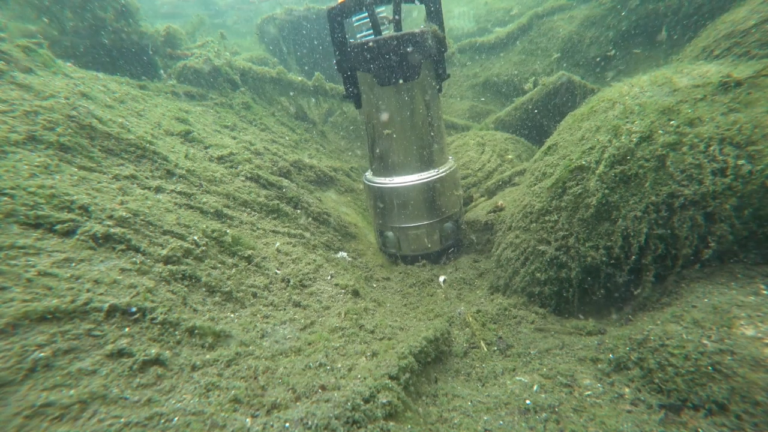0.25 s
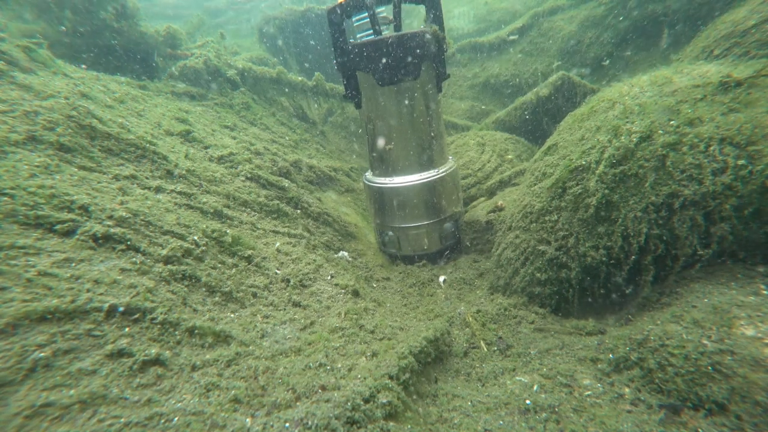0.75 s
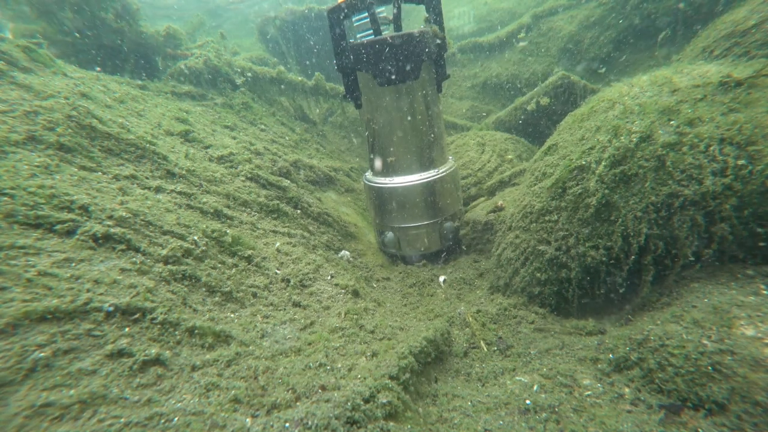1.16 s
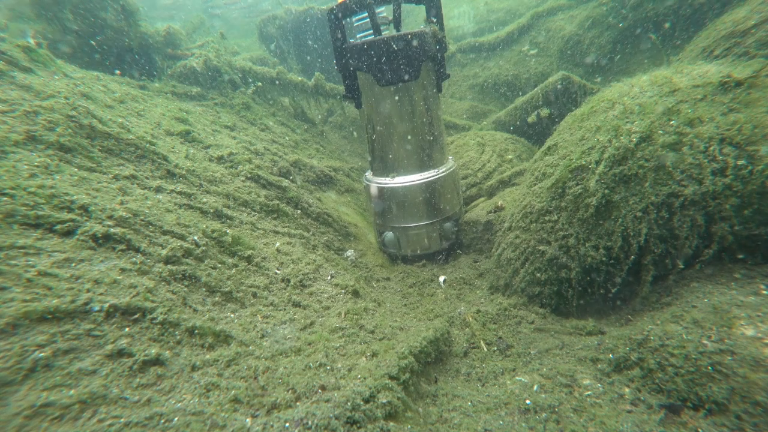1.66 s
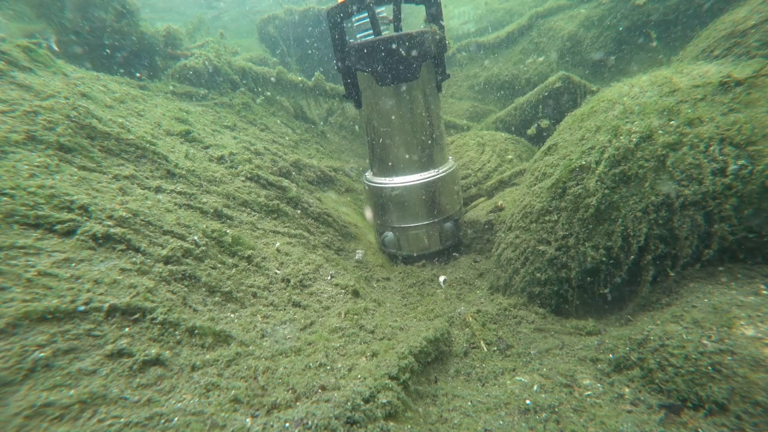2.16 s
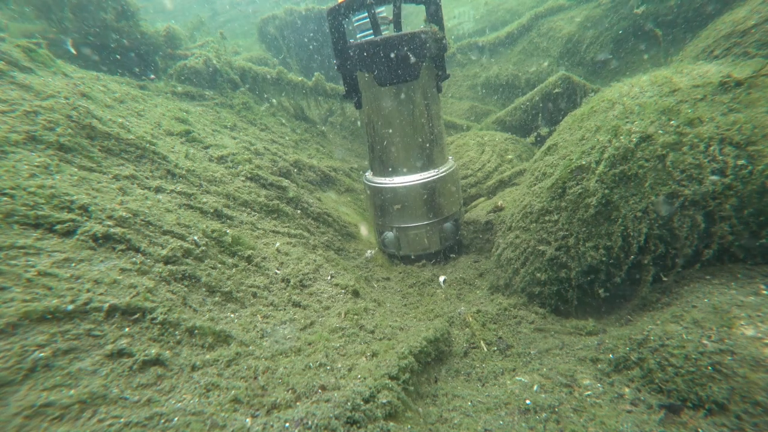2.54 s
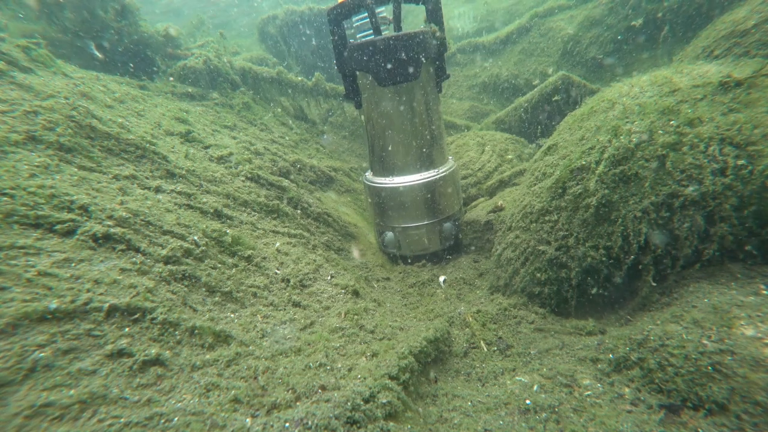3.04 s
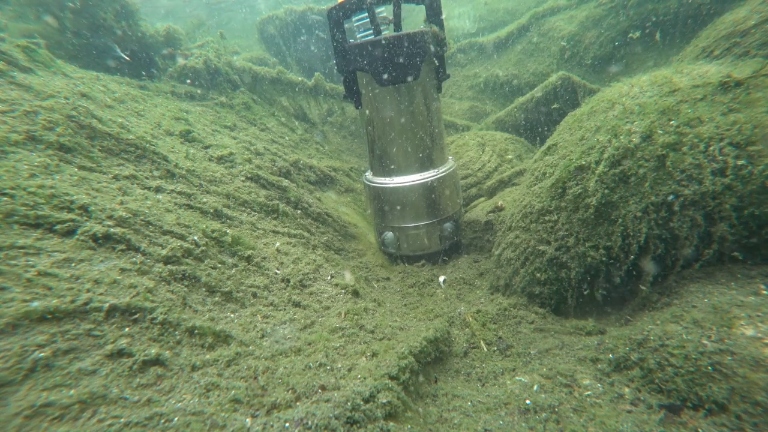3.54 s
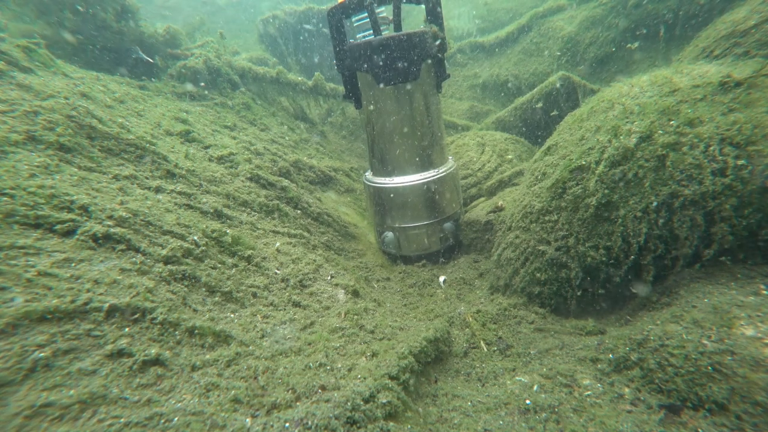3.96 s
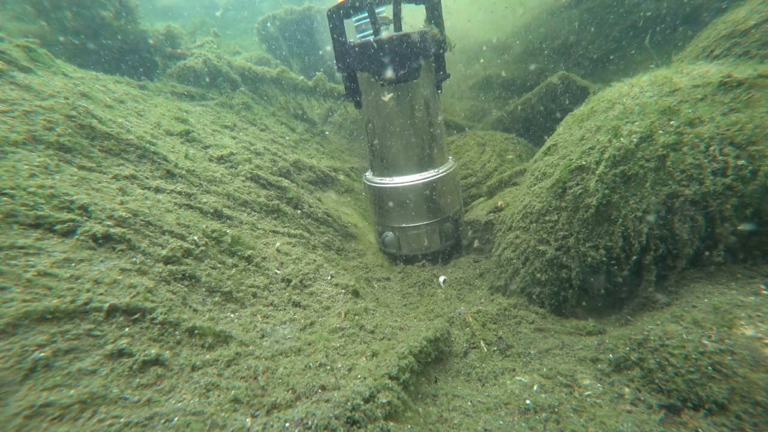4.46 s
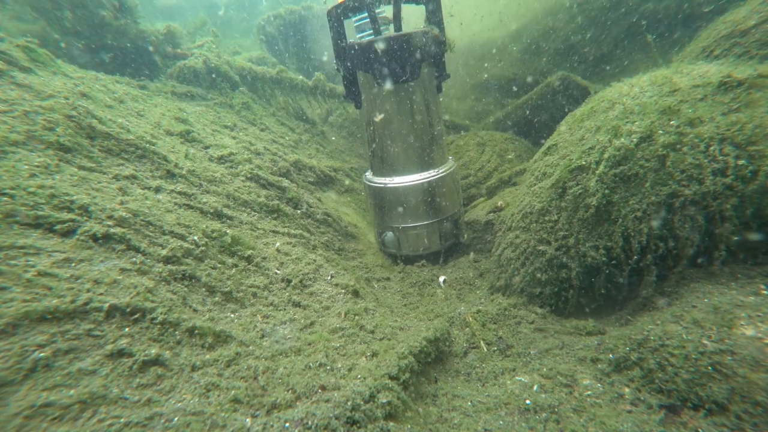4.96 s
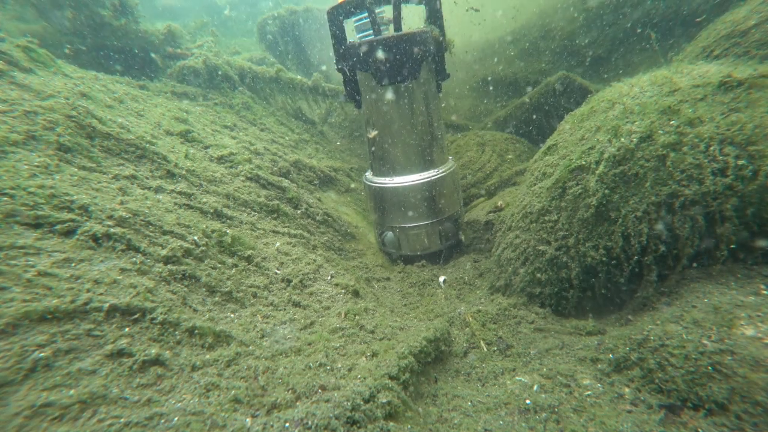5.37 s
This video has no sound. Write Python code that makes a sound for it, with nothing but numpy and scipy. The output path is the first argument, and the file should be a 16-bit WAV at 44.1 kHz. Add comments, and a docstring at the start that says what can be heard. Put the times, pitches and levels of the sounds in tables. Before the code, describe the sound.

Underwater, a running pump gives a low electric hum and an even, fizzing rush of water dotted with bubble blips and ticks.

```python
"""Submersible pump in a pond

A pump runs on the pond bed, heard through two microphones in a sealed case close by.
Its motor hums at twice the mains rate under a churning rush, with bubbles and sharp ticks.
Turbulent water, bubbles and tiny collapsing cavities shake the case, whose resonances
reach each microphone with a different strength and phase."""
import sys
import numpy as np
from scipy import signal
from scipy.fft import rfft, irfft, next_fast_len
from scipy.io import wavfile
from scipy.ndimage import uniform_filter1d

SR = 44100
rng = np.random.default_rng(int(sys.argv[2]) if len(sys.argv) > 2 else 0)


def persist_wave(psi):
    """Save psi, clipped to +-1, as 16-bit WAV."""
    counts = np.round(np.clip(psi, -1, 1) * 32767).astype(np.int16)
    wavfile.write(sys.argv[1], SR, np.atleast_2d(counts).T)


N = 247401
TIME = np.arange(N) / SR


def gain_of(db):
    return 10 ** (np.asarray(db) / 20)


def unit_rms(x):
    return x / np.sqrt(np.mean(x ** 2) + 1e-20)


def add(mix, start_s, sound):
    part = mix[..., round(start_s * SR):][..., :sound.shape[-1]]
    part += sound[..., :part.shape[-1]]


def wander(hz):
    """Random drift of rms 1, changing about hz times a second."""
    coarse = uniform_filter1d(rng.standard_normal(N // 64 + 2), 1 + int(SR / 64 / hz))
    return np.interp(np.arange(N) / 64, np.arange(len(coarse)), unit_rms(coarse))


def minimum_phase(gain):
    """The spectrum with this gain and the sharpest possible attack."""
    cepstrum = irfft(np.log(gain + 1e-6))
    half = len(cepstrum) // 2
    return np.exp(rfft(np.r_[cepstrum[0], 2 * cepstrum[1:half], cepstrum[half], np.zeros(half - 1)]))


def eddies(level_db, top_hz):
    """Water slides past each microphone port on its own: a faint, wide, low wash."""
    wash = signal.sosfilt(signal.butter(2, top_hz, fs=SR, output="sos"), rng.standard_normal((2, N)))
    return gain_of(level_db) * unit_rms(wash)


# Partials of the hum: harmonic, left_db, right_db
HUM_PARTIALS = [(1, -33.6, -33.2), (2, -59, -58), (3, -61, -57), (6, -68, -69), (8, -57, -53)]
def motor_hum(pitch_hz):
    """Magnetic pull of the windings: steady sines that waver a little in level."""
    phase, out = 2 * np.pi * pitch_hz * TIME, 0
    for harmonic, left_db, right_db in HUM_PARTIALS:
        tone = np.sqrt(2) * np.sin(harmonic * phase + 2 * np.pi * rng.random())
        out += gain_of([[left_db], [right_db]]) * tone * gain_of(0.69 * wander(hz=1.2))
    return out


def bubble_swarm(per_s, low_hz, high_hz, decay_cycles, weakest_db):
    """Small bubbles of random size, each ringing as a short dying sine."""
    out, t = np.zeros(N), np.arange(3000) / SR
    for when, pitch, strength in rng.random((2000, 3))[:int(per_s * N / SR)]:
        hz = low_hz * (high_hz / low_hz) ** pitch
        envelope = (1 - np.exp(-t / 0.0033)) * np.exp(-t * hz / decay_cycles)
        level = gain_of(weakest_db + 10.4 * strength)
        add(out, when * N / SR, level * envelope * np.sin(2 * np.pi * hz * t))
    return out


# Bubbles that stand out: peak_s, level_db, pitch_hz, rise_ms, fall_ms
SOLO_BUBBLES = [(0.04, -30.5, 747, 8.6, 5.2), (0.204, -30, 791, 4, 4.9), (0.553, -23.5, 716, 7, 5.6),
                (0.762, -39, 780, 2, 5.3), (0.915, -36, 792, 6, 9.6), (0.945, -36, 797, 11, 5.7),
                (0.97, -27.5, 789, 8.4, 13), (0.981, -30, 1344, 14, 8.7), (1.044, -30, 766, 6.6, 8.3),
                (1.187, -33, 740, 15, 6), (1.422, -25, 729.6, 6.2, 12), (1.547, -29, 806, 6, 15),
                (1.585, -34, 770, 4.5, 3.3), (1.615, -28.5, 574, 12, 14), (1.63, -42, 738, 9.3, 7.3),
                (1.787, -33.5, 830, 2.5, 8), (2.003, -28, 790, 2, 3.7), (2.852, -31, 820, 18, 8),
                (2.995, -30, 789, 9.6, 3.1), (3.268, -31, 920, 7.4, 5), (3.305, -27, 780, 1.3, 6.6),
                (3.314, -29, 676, 6.7, 8), (3.327, -34, 787, 12, 7.8), (3.349, -34, 800, 6, 7.8),
                (4.255, -25, 817, 6, 9.7), (4.27, -28, 750, 11, 6), (4.281, -31, 837, 4.4, 8),
                (4.385, -46, 400, 8, 8), (4.58, -32, 800, 9.7, 15), (4.635, -34, 818, 9, 16),
                (4.698, -28.5, 826, 10, 13), (4.798, -35, 830, 3.1, 7.3), (4.851, -30, 800, 9.5, 5.7),
                (4.912, -30, 858, 18, 19), (5.015, -30, 812, 4, 15), (5.059, -32, 811, 22, 21),
                (5.131, -27, 856, 4.2, 6.7), (5.203, -22.5, 818, 6.2, 6.5), (5.289, -25, 810, 6.6, 5),
                (5.336, -29, 820, 11, 4.2), (5.479, -28, 840, 3.5, 6.6)]
def solo_bubbles(roughness):
    """Each swells and dies as a fluttering tone, panned and phased by the nearest resonance."""
    out, modes = np.zeros((2, N)), np.array(RESONANCES)
    flutter = 1 - roughness + roughness * wander(hz=170)
    for peak_s, level_db, hz, rise_ms, fall_ms in SOLO_BUBBLES:
        t = np.arange(-min(peak_s, .04), .06, 1 / SR)
        _, _, left_db, right_db, lead = modes[abs(modes[:, 0] - hz).argmin()]
        phase, pan_db = 2 * np.pi * hz * t, left_db - right_db
        tone = gain_of([[pan_db / 2], [-pan_db / 2]]) * np.sin([phase, phase + lead])
        envelope = np.exp(-(1000 * t / np.where(t < 0, rise_ms, fall_ms)) ** 2)
        add(out, peak_s + t[0], gain_of(level_db) * envelope * tone)
    return out * flutter


# Accented cavity collapses, levels before filtering: start_s, dull_db, bright_db
COLLAPSES = [(0.0097, 22, 18), (0.1955, 24, 15), (0.1985, 19, 18), (0.452, 17.5, 22.5), (0.9238, 18, 22),
             (0.9778, 21.5, 26), (1.0752, 24.5, 24.5), (1.0758, 18, 17), (1.4624, 19.5, 20),
             (1.4759, 19, 18), (1.4863, 24, 24), (1.8988, 21, 16.5), (1.9057, 14, 23.5), (1.9882, 19, 22),
             (2.0447, 21.5, 11), (2.3229, 21, 10), (2.3455, 20.5, 20), (2.4333, 23.5, 25),
             (2.434, 23.5, 25.5), (2.7544, 19, 25), (3.1232, 21, 10), (3.1976, 25, 15), (3.2457, 25.5, 10),
             (3.2495, 20, 21.5), (3.2637, 24, 10), (3.2673, 17.5, 25), (3.2703, 26.5, 24.5),
             (3.2708, 20, 20), (3.4291, 23.5, 24), (3.6115, 26, 17), (3.6239, 21, 12), (3.7386, 21, 10),
             (3.7533, 20, 17), (3.7715, 22.5, 18), (3.7751, 26.5, 25), (3.7997, 24, 22), (3.8953, 22, 12.5),
             (4.0286, 22.5, 17.5), (4.0364, 20.5, 20), (4.1636, 20, 12), (4.8062, 20.5, 10),
             (4.8543, 20.5, 10), (4.9479, 20, 18.5), (5.0635, 20.5, 13), (5.1116, 19, 17),
             (5.1254, 22.5, 19), (5.4376, 21.5, 15), (5.5925, 21, 12.5)]
def cavity_ticks(ring, f, per_s, base_db, spread_db):
    """Each collapse is a pressure spike striking the case: the accents plus weaker random ones."""
    chance, strength = rng.random(N), np.minimum(rng.exponential(1, N), 3)
    tilt = 2 * rng.random(N) - 1
    spikes = (chance < per_s / SR) * gain_of(base_db + spread_db * (strength + np.array([tilt, -tilt])))
    for start_s, *levels_db in COLLAPSES:
        spikes[:, round(start_s * SR)] += gain_of(levels_db)
    dull, bright = rfft(spikes, 2 * len(f) - 2)
    bright *= gain_of(2.5 * np.log2((f + 1) / 11000))  # rises 2.5 dB per octave
    crossover = 1 / (1 + (7800 / (f + 1)) ** 8)
    return -irfft(ring * ((1 - crossover) * dull + crossover * bright))[:, :N]


def crackle(per_s, spread_db, decay_ms, sputter_db):
    """Power envelope of tiny cavity swarms: random bursts, and a sputter after each accent."""
    chance, strength = rng.random(N), np.minimum(rng.exponential(1, N), 4)
    power = (chance < per_s / SR) * gain_of(2 * spread_db * strength)
    for start_s, *levels_db in COLLAPSES:
        power[round(start_s * SR)] += gain_of(2 * (max(levels_db) + sputter_db))
    tail = np.exp(-np.arange(600) / SR * 1000 / decay_ms)
    return signal.oaconvolve(power, tail)[:N].clip(0)


def struck_case(power, cross, decay_ms):
    """Stereo spectrum of the high resonances struck at once, cut short with their energy kept."""
    left = minimum_phase(np.sqrt(power[0]))
    right = left * np.sqrt(power[1] / power[0]) * cross / abs(cross)
    ring = irfft(np.array([left, right]))
    size = ring.shape[1]
    lag_ms = 1000 * size / SR * abs(np.fft.fftfreq(size))
    snap = ring * np.exp(-lag_ms / decay_ms)
    return rfft(snap * np.linalg.norm(ring) / np.linalg.norm(snap))


# Path of the strongest high resonance, used as a shift about its mean: time_s, centre_hz
TREBLE_SLIDE = [(0.0, 4890), (1.0, 4860), (2.9, 4850), (3.3, 4815), (4.5, 4900), (5.6, 4900)]
def case_shift(spectrum, f, split_hz, waver_hz):
    """The case shifts in the current, so the sound above the split slides a little in pitch."""
    size = 2 * len(f) - 2
    centre_hz = np.interp(TIME, *np.transpose(TREBLE_SLIDE)) + waver_hz * wander(hz=8)
    shift = np.exp(2j * np.pi * np.cumsum(centre_hz - centre_hz.mean()) / SR)
    lower = irfft(spectrum * (f <= split_hz))[:, :N]
    upper = 2 * np.fft.ifft(spectrum * (f > split_hz), size)[:, :N]
    return lower + (upper * shift).real


# Level ride of the treble, with a presence lift near 3 kHz: time_s, level_db, presence_db
FIZZ_RIDE = [(0.0, 2.5, 4.5), (1.0, 2.5, 6), (1.8, 2, 5), (2.0, 3.5, 7.5), (2.25, 4.5, 2), (2.45, 3.1, 7.5),
             (3.0, 1.5, 7), (3.25, 3, 7), (3.45, 2.3, 7), (3.75, 3.5, 8.5), (4.3, 2, 8), (4.65, 3, 5),
             (4.95, 3, 7), (5.61, 1.9, 8)]
def fizz(flicker_db):
    """The treble swells and flickers: its level and presence curves."""
    time_s, level_db, presence_db = np.transpose(FIZZ_RIDE)
    level_db = np.interp(TIME, time_s, level_db) + flicker_db * wander(hz=24)
    return level_db, np.interp(TIME, time_s, presence_db)


# Level ride of the mids around 800 Hz: time_s, level_db, tilt_db_per_octave
GURGLE_RIDE = [(0.0, 0.5, 6), (0.3, 2.5, 6), (0.65, 1, 5.5), (0.9, 3.5, 0), (1.25, 0, 10), (1.5, 3.5, 2),
               (1.9, 1.5, 4), (2.9, 2, 3.5), (3.08, -3, 12), (3.3, 0.7, 3), (3.7, 3.5, 7), (3.95, -2.5, 3),
               (4.3, 0.5, 6.5), (4.65, 1.5, 2), (4.85, 0, 3), (5.0, -0.5, 5), (5.25, 1, 2),
               (5.61, 2.5, 1.5)]
def gurgle(flicker_db):
    """The mids surge and lean toward higher pitch: their level and tilt curves."""
    time_s, level_db, tilt = np.transpose(GURGLE_RIDE)
    level_db = np.interp(TIME, time_s, level_db) + flicker_db * wander(hz=20)
    return level_db, np.interp(TIME, time_s, tilt)


# Resonances of water, pump and case: pitch_hz, pole_width_hz, left_db, right_db, right_lead_rad
RESONANCES = [(59, 58, 15.6, 15.8, 0.1), (143, 92, 8.3, 9.0, 0.12), (250, 125, -0.5, 2.6, 0.5),
              (345, 90, -22, -13, 0.3), (445, 82, -11.4, -7.3, -1.15), (585, 126, -7.4, -4.8, 1.52),
              (582, 248, -6.9, -3.1, 2.86), (697, 100, 5.0, 5.9, 2.54), (766, 108, 1.2, 9.4, -0.56),
              (815, 131, 7.5, 10.1, -1.37), (906, 103, 1.0, 3.6, -1.56), (1019, 144, -7.9, -0.3, -1.03),
              (1102, 122, -15.8, -1.8, -1.15), (1188, 449, -2.4, 0.2, -2.47), (1359, 110, 3.7, 2.3, -2.4),
              (1561, 140, -0.4, -5.3, -2.6), (1666, 116, -2.8, -9.6, -1.65), (1700, 327, -8.2, -7.6, 2.95),
              (1854, 159, -16.5, -8.5, -0.75), (2084, 250, -14.1, -13.3, -1.28),
              (2237, 158, -20.2, -18.2, -1.05), (2397, 1160, -23.0, -21.7, 2.95),
              (2721, 736, -16.3, -22.9, -0.75), (3000, 600, -8.5, -6.8, -1.69),
              (3229, 555, -10.6, -19.7, -1.55), (3606, 1598, -14.7, -14.7, 3.11),
              (4330, 460, -4.6, -0.9, -2.3), (4826, 380, -1.6, 0.8, -1.83), (5046, 348, -4.5, -3.8, -2.15),
              (5484, 562, -9.8, -10.3, -1.62), (5662, 1259, -15.0, -11.2, 2.96),
              (6088, 1195, -6.0, -9.7, -1.97), (6634, 969, -7.1, -19.3, -2.68),
              (6967, 560, -5.5, -16.7, 0.06), (7238, 490, -15.9, -13.4, -1.27),
              (8066, 2429, -27.6, -20.0, -0.24), (8494, 1500, -13.0, -31.3, -1.71),
              (9413, 1439, -17.7, -18.9, 0.08), (9593, 832, -14.5, -30.2, -2.12),
              (10354, 1514, -13.2, -24.4, 0.21), (10868, 2222, -15.0, -13.8, 0.02),
              (11940, 934, -19.0, -22.9, 1.03), (12729, 3599, -16.0, -18.5, -0.79),
              (13776, 3599, -18.3, -19.0, 0.46), (15026, 1864, -15.0, -16.6, -0.36)]
def water_rush(gain_db, churn_db):
    """Turbulence and small bubbles shake each resonance; collapsing cavities strike the high ones."""
    size = 2 * next_fast_len(N // 2 + 4096)
    f = np.fft.rfftfreq(size, 1 / SR)
    delay = np.exp(-2j * np.pi * f / SR)
    gurgle_db, tilt = gurgle(flicker_db=1.3)
    fizz_db, presence_db = fizz(flicker_db=1.05)
    bursts = crackle(per_s=150, spread_db=2.0, decay_ms=0.65, sputter_db=-18)
    swarm = bubble_swarm(per_s=110, low_hz=853.5, high_hz=3045, decay_cycles=15.5, weakest_db=-15)
    spectrum = treble_power = treble_cross = 0
    for hz, width_hz, left_db, right_db, lead in RESONANCES:
        octaves = np.log2(hz / 800)
        mids, treble = np.exp(-octaves ** 2), 1 / (1 + (2200 / hz) ** 3)  # band weights
        sway_db = 1.9 * np.exp(-(octaves / 3.2) ** 2) * wander(hz=11)  # patchiest in the mids
        sway_db += mids * (gurgle_db + tilt * octaves) + treble * fizz_db
        sway_db += np.exp(-np.log2(hz / 2900) ** 2) * presence_db
        turbulence = rng.standard_normal(N) * gain_of(sway_db) * np.sqrt(1 + 1.4 * treble * bursts)
        drive = gain_of(mids * churn_db) * unit_rms(turbulence) + swarm
        radius = np.exp(-np.pi * width_hz / SR)
        pole = (1 - radius) / (1 - radius * np.exp(2j * np.pi * hz / SR) * delay)
        ring = pole ** 3  # three poles in a row keep the valleys between resonances dark
        mics = np.array([[gain_of(left_db)], [gain_of(right_db) * np.exp(1j * lead)]])
        spectrum += mics * ring * rfft(drive, size)
        # gather the colour and the left-right phase of the ticks
        ring_power = treble * abs(ring) ** 2
        treble_power += abs(mics) ** 2 * ring_power
        treble_cross += mics[0] * mics[1] * ring_power
    snap = struck_case(treble_power, treble_cross, decay_ms=1.0)
    ticks = cavity_ticks(snap, f, per_s=130, base_db=9.5, spread_db=2.7)
    spectrum /= np.sqrt(1 + (22 / (f + 1)) ** 2)  # the sealed case blocks the slowest pressure changes
    return gain_of(gain_db) * (case_shift(spectrum, f, split_hz=3800, waver_hz=45) + ticks)


def scene():
    """The rush up front, with hum, single bubbles and a faint wash around it."""
    return (water_rush(gain_db=-26.5, churn_db=-1.5) + motor_hum(pitch_hz=100.07)
            + solo_bubbles(roughness=0.15) + eddies(level_db=-57.5, top_hz=300))


def record(dry):
    """A steep high cut at 15.8 kHz."""
    high_cut = signal.firwin(1023, 15800, window=("kaiser", 10), fs=SR)
    return signal.oaconvolve(dry, high_cut[None], "same")


dry = scene()
out = record(dry)
persist_wave(out)
```